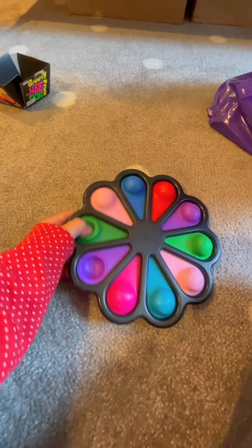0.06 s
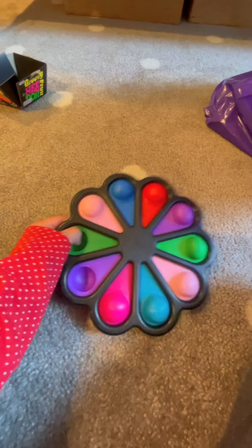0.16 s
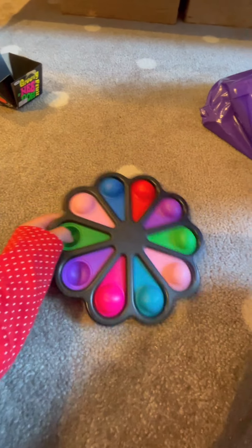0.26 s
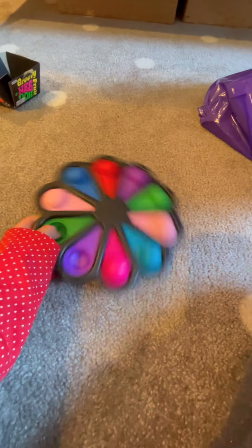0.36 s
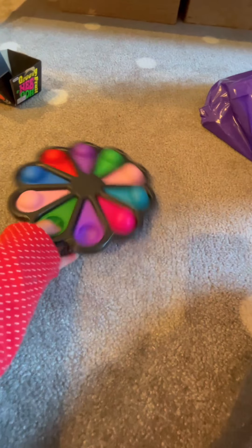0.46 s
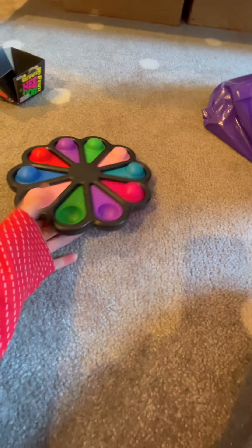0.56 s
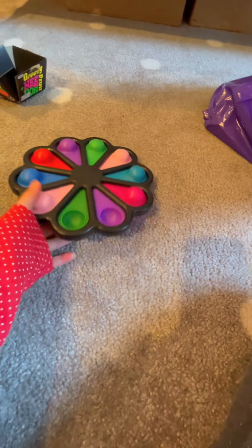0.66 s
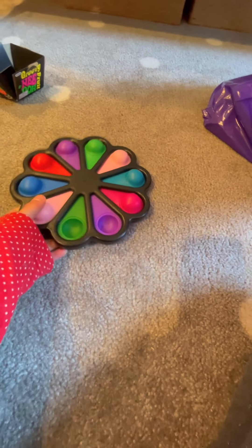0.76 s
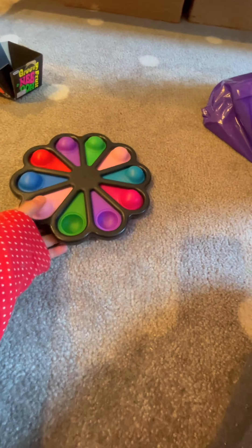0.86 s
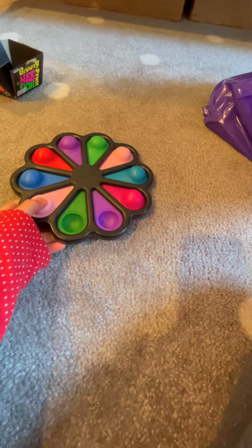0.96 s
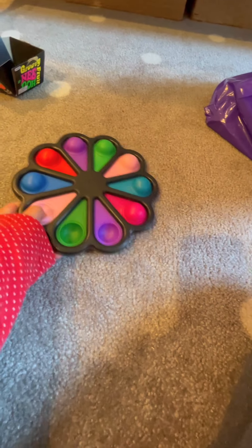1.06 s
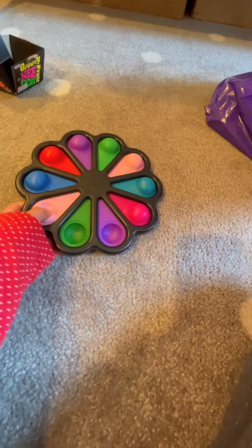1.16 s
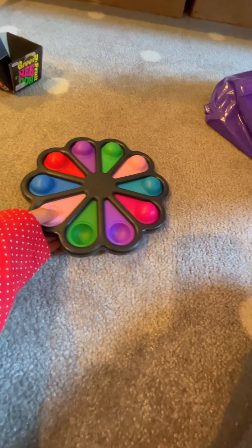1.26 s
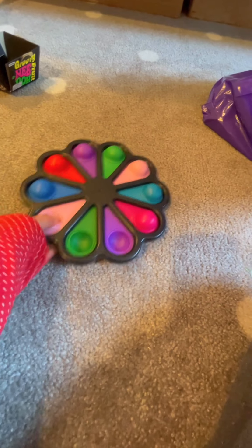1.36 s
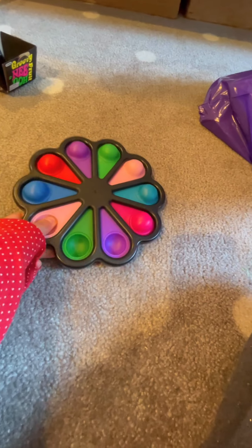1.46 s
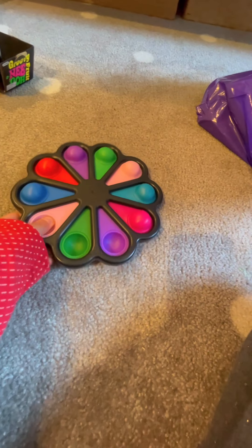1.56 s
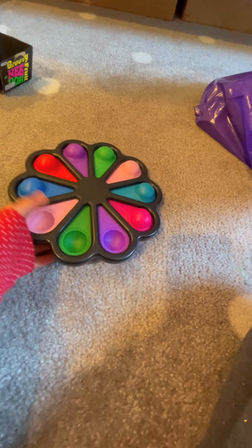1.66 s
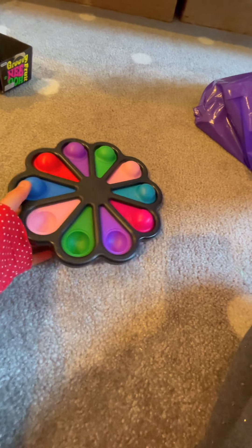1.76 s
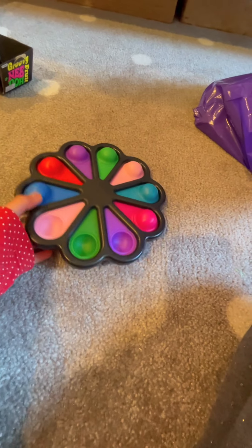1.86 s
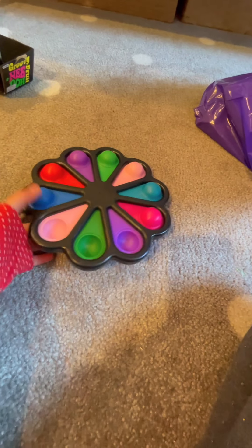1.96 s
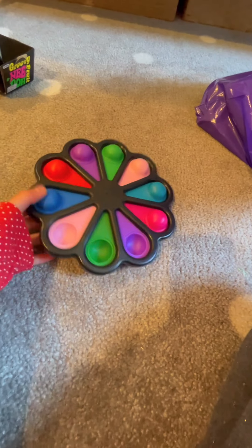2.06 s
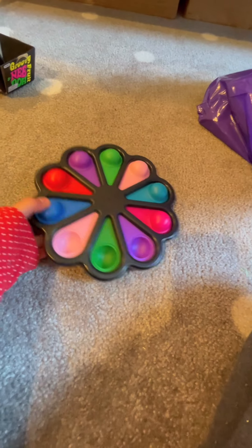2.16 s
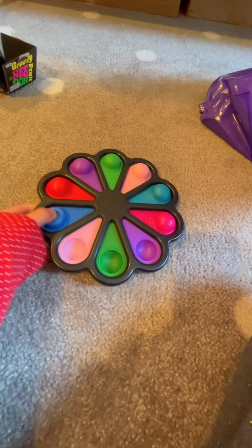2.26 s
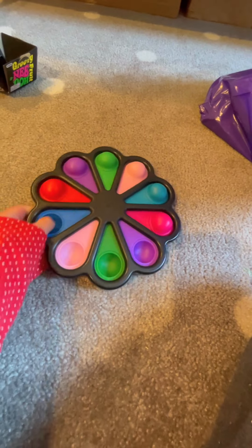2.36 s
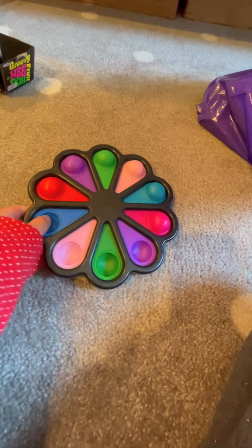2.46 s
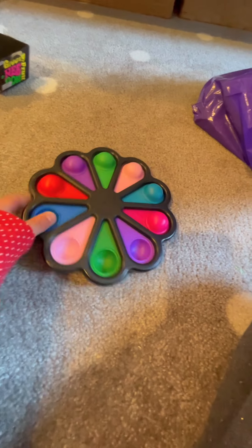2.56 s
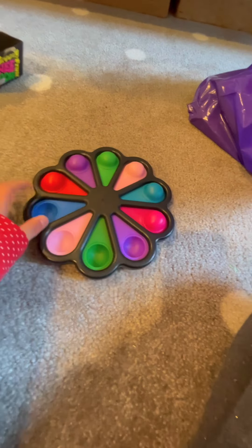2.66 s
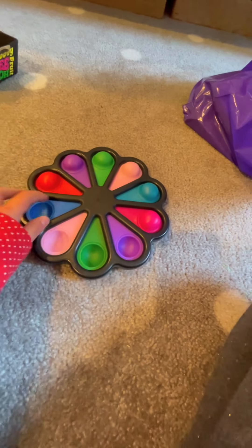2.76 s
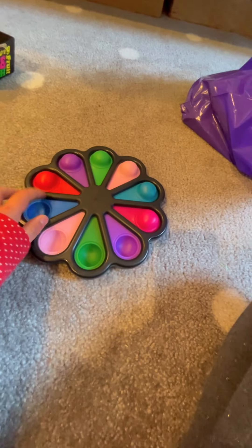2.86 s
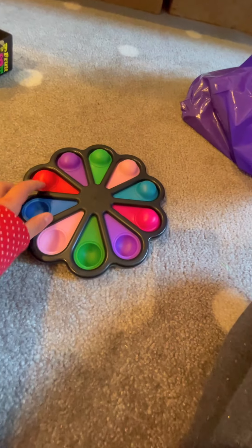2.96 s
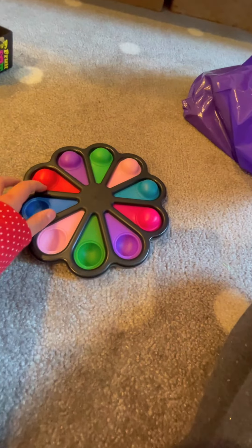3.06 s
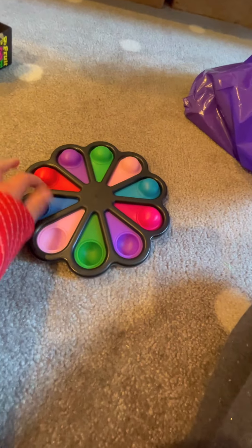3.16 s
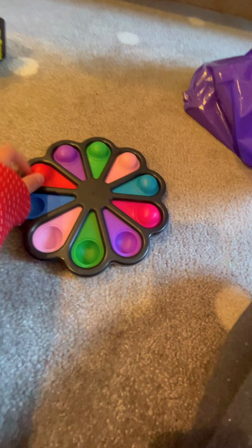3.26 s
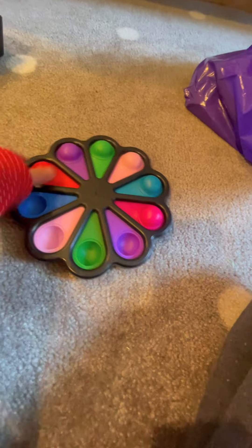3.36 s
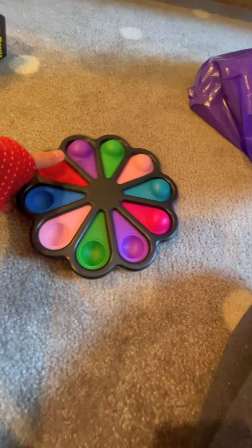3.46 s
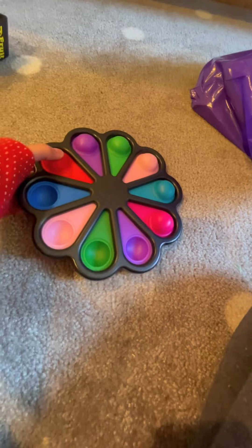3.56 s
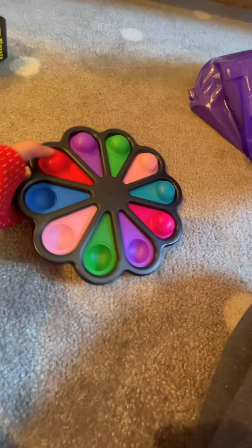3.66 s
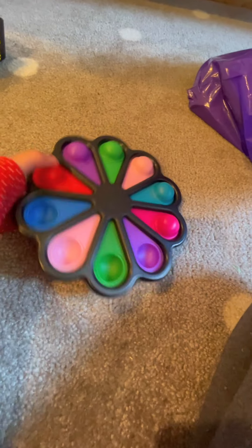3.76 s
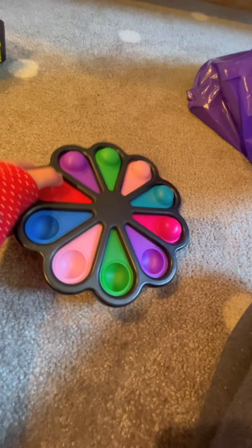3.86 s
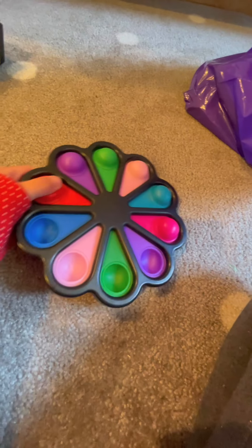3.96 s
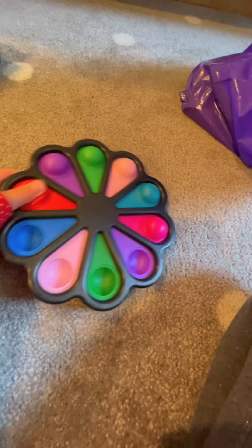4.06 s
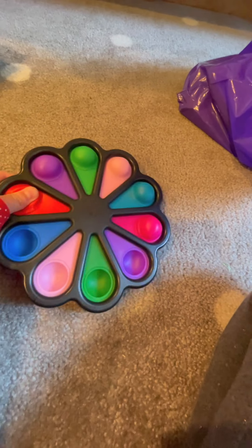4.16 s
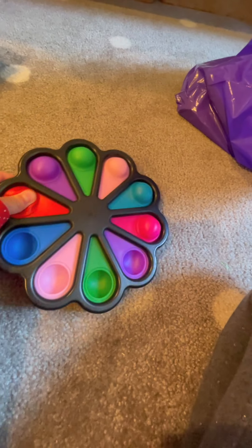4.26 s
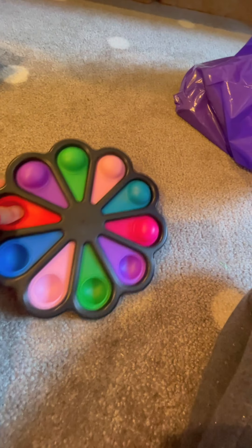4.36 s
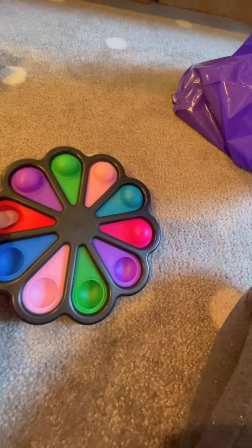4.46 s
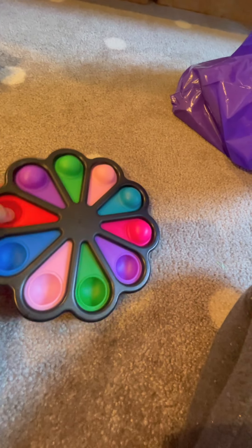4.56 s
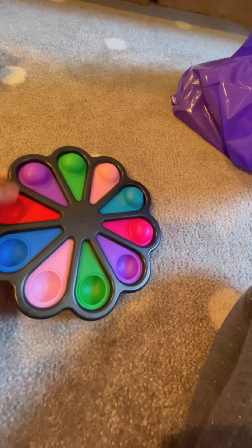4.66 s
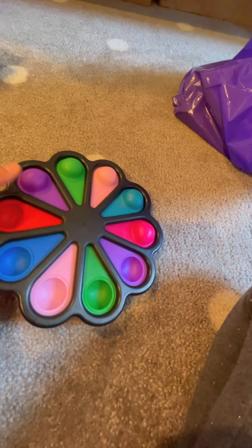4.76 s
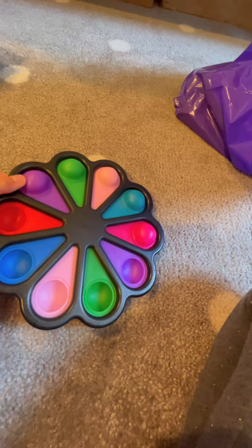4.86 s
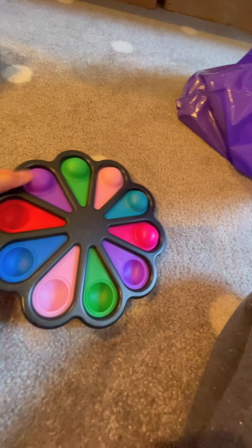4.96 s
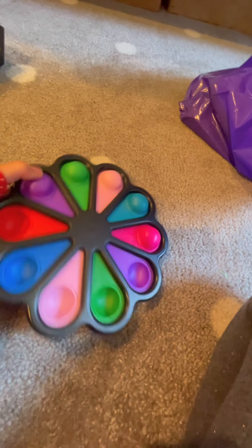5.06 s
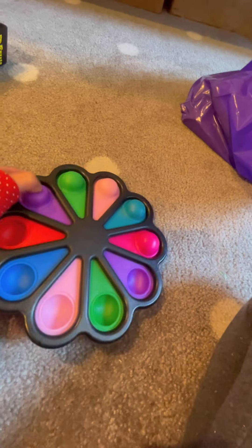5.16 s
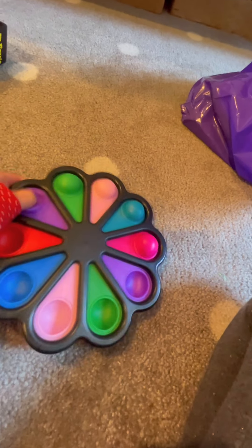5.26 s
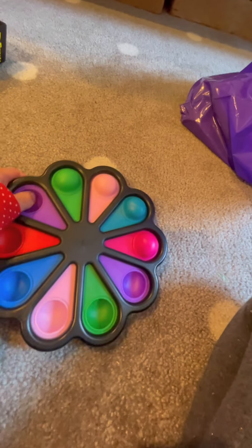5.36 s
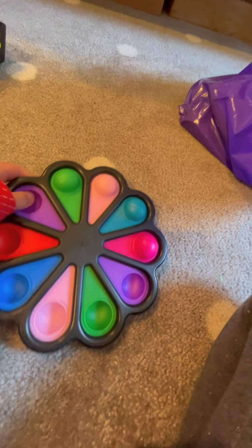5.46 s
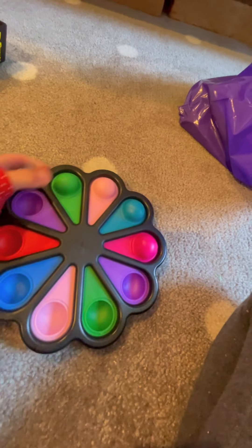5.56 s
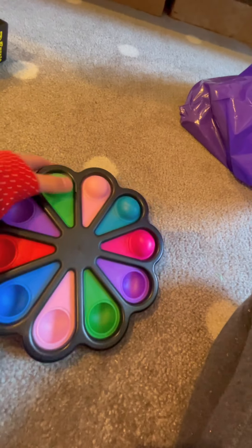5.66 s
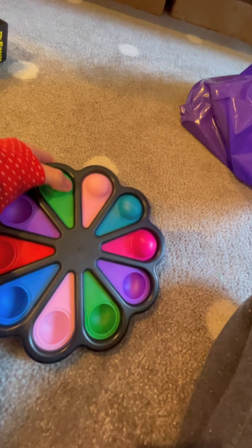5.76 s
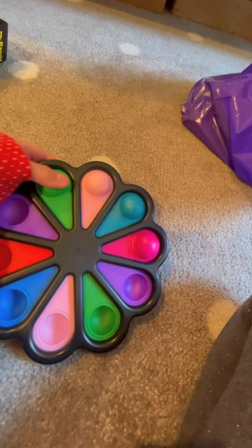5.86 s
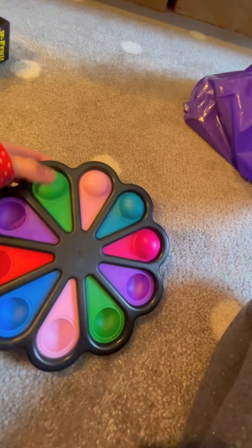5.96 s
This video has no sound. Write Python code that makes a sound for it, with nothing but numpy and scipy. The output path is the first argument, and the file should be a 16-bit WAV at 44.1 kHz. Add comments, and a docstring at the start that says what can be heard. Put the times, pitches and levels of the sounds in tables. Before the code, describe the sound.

A finger presses a fidget toy's silicone domes, making close, hollow pops with small plastic ticks between them.

```python
"""Silicone domes of a plastic fidget toy pop under a finger, over a carpet and close to a phone.
Each dome buckles and snaps through: a pulse of falling pitch, coloured by the resonances of its hollow
and of the frame. Between pops, fingertips tick on the frame and rub on the silicone.
A sleeve rustles and a small room reverberates; behind lie room tone, a far hum and one soft thump."""
import sys
import numpy as np
from scipy import signal
from scipy.fft import rfft, irfft, next_fast_len
from scipy.io import wavfile
from scipy.ndimage import map_coordinates

SR = 44100
rng = np.random.default_rng(int(sys.argv[2]) if len(sys.argv) > 2 else 0)


def output_pcm(signal):
    """Save a mono or channel-first signal as 16-bit PCM at the path in sys.argv[1].

    Samples are clipped to [-1, 1] before scaling.
    """
    pcm = np.clip(np.atleast_2d(signal).T, -1, 1) * 32767
    wavfile.write(sys.argv[1], SR, np.round(pcm).astype(np.int16))


N = 264600

# stereo width of the diffuse field: (frequency [Hz], side minus mid [dB])
DIFFUSE_WIDTH = [(60, -12), (99, -15), (160, -16.5), (270, -14), (450, -6.5), (740, 0), (1220, -4),
                 (2010, -6), (3330, 1.5), (5500, -2), (9080, 9.5), (15000, 10.5)]


def amp(db):
    """Amplitude ratio of a level in decibels."""
    return 10 ** (np.asarray(db) / 20)


def along(points, hz):
    """Interpolation of (frequency, value) points on a logarithmic frequency axis."""
    f, v = np.transpose(points)
    return np.interp(np.log(hz + 1), np.log(f + 1), v)


def wobble(rate):
    """Smooth random modulation: a spline with rate knots a second."""
    knots = rng.standard_normal(int(N * rate / SR) + 4)
    return map_coordinates(knots, [np.arange(N) * rate / SR])


def filtered(x, response):
    """Linear filtering: the spectrum of x times a complex frequency response."""
    n = x.shape[-1]
    m = next_fast_len(n + 2048)
    return irfft(rfft(x, m) * response(np.fft.rfftfreq(m, 1 / SR)), m)[..., :n]


def blend(*parts):
    """Power summation of spectra, each given as (shape, frequency scale, level [dB])."""
    return lambda f: np.sqrt(sum(amp(db + along(np.multiply(shape, [hz, 1]), f)) ** 2
                                 for shape, hz, db in parts))


def strokes(times, lengths, db):
    """Superposed Gaussian envelopes, each 9 dB down at 0.55 of its length from its middle."""
    t = np.arange(0, N, 32) / SR
    swells = np.exp(-((t - times[:, None]) / (.55 * lengths[:, None])) ** 2)
    return np.repeat(amp(db) @ swells, 32)[:N]


def mid_side_gains(width, hz):
    """Constant-power division between mid and side."""
    angle = np.arctan(amp(along(width, hz)))
    return np.array([np.cos(angle), np.sin(angle)])


def left_right(mid, side):
    """Sum and difference give the left and right channels."""
    return np.array([mid + side, mid - side])


def diffuse_noise(spectrum, grain=1):
    """A diffuse field: independent mid and side noises, scaled so that the mid has rms 1."""
    response = lambda hz: amp(along(spectrum, hz)) * [np.ones_like(hz), amp(along(DIFFUSE_WIDTH, hz))]
    mid, side = filtered(grain * rng.standard_normal((2, N)), response)
    return left_right(mid, side) / np.sqrt(np.mean(mid ** 2))


def room_tone():
    """Ambient noise: a diffuse field, mostly bass, whose level wavers slightly."""
    # noise spectrum: (frequency [Hz], relative density [dB])
    spectrum = [(15, -34.5), (25, -5.5), (80, 1), (127, -5), (170, -12.5), (249, -11), (317, -10),
                (624, -23), (887, -24), (1020, -28.5), (1700, -35), (2160, -43), (3520, -47.5),
                (4030, -53.5), (16000, -69)]
    return amp(-57.5 + .8 * wobble(4.6)) * diffuse_noise(spectrum)


def appliance_hum():
    """Two harmonics of a far appliance, slowly modulated in level and phase."""
    # harmonics: (frequency [Hz], rms level [dB])
    harmonics = [(59.2, -60), (118.4, -63.5)]
    t = np.arange(N) / SR
    hum = 0
    for hz, db in harmonics:
        amplitude = np.sqrt(2) * amp(db + 1.8 * wobble(6))
        hum += amplitude * np.exp(2j * np.pi * hz * t + .4j * wobble(3.3))
    return left_right(hum.real, amp(-8) * hum.imag)  # a weaker side in quadrature: the two microphones differ in phase by some 40 degrees


def soft_thump():
    """One soft thump: a low tone burst under a Gaussian envelope."""
    # burst: (time [s], level [dB], frequency [Hz], half-width [s])
    burst = (1, -42.5, 55, 0.04)
    time, db, hz, half_width = burst
    t = np.arange(N) / SR - time
    return -amp(db) * np.exp(-(t / half_width) ** 2) * np.cos(2 * np.pi * hz * t)


def reverberation(x):
    """Double-slope decay: convolution with a noise tail that dies at its own rate in each band."""
    # decay of the near field of reflections: (frequency [Hz], reverberation time [s])
    decay_times = [(200, .13), (500, 0.17), (1000, .22), (2500, 0.18), (6000, 0.16), (12000, .15)]
    # spectrum of the tail: (frequency [Hz], level [dB])
    colour = [(220, -12.5), (400, -13.5), (800, -9), (1500, -15.5), (2300, -14.5), (3300, -10.5),
              (7000, -12.5), (14000, -26.5)]
    hz, t, noise = signal.stft(rng.standard_normal((2, len(x))), SR, nperseg=256)
    drop_db = -60 * t / along(decay_times, hz)[:, None]
    fade = amp(drop_db) + amp(-19 + drop_db / 2)  # the slower slope comes from beyond the near walls
    fade *= amp(along(colour, hz))[:, None] / np.sqrt(np.sum(fade ** 2, 1, keepdims=True) * 128)
    tail = signal.istft(noise * fade * mid_side_gains(DIFFUSE_WIDTH, hz)[:, :, None], SR, nperseg=256)[1]
    onset = np.clip(np.arange(tail.shape[1]) / SR / .0031 - .4, 0, 1)  # walls answer after a few ms
    return left_right(*signal.fftconvolve(x[None], tail * onset, axes=1)[:, :len(x)])


def sleeve():
    """Friction noise of cloth: a grainy rustle that swells with each arm movement."""
    # movements: (middle time [s], length [s], level [dB])
    movements = [(0.03, 0.21, -84), (0.245, 0.21, -83), (0.488, 0.19, -79.5), (0.783, 0.15, -86),
                 (1.023, 0.14, -85.5), (1.36, 0.32, -82.5), (1.798, 0.33, -90.5), (2.198, .15, -86.5),
                 (2.583, 0.21, -80.5), (2.945, .22, -79.5), (3.198, .12, -91), (3.39, 0.27, -81.5),
                 (3.716, 0.16, -85.5), (4.035, .2, -86.5), (4.552, 0.26, -83.5), (5.021, .2, -85),
                 (5.198, 0.13, -87.5), (5.5, 0.22, -84.5), (5.73, 0.16, -82.5), (5.97, 0.16, -91)]
    # rustle spectrum: (frequency [Hz], relative density [dB])
    cloth = [(800, -26.5), (2000, -5), (3500, -7), (5500, -1), (7500, -7.5), (9000, -23.5), (11500, -32.5),
             (15000, -19.5)]
    grain = amp(1.2 * wobble(25) + 2 * wobble(300))
    return strokes(*np.transpose(movements)) * diffuse_noise(cloth, grain)


def rubbing():
    """Sliding friction of skin on silicone: the same slips modulate a squeaky band and a hiss."""
    # strokes: (middle time [s], length [s], squeak level [dB], hiss level [dB])
    rubs = [(0.103, 0.025, -54, -64), (0.28, 0.053, -74, -83), (0.446, 0.057, -75, -83.5),
            (0.487, 0.02, -72, -87), (0.772, 0.19, -81.5, -86.5), (0.972, 0.069, -79, -88),
            (1.225, 0.03, -66, -81), (1.6, 0.044, -70, -84), (1.633, 0.024, -81, -98),
            (1.747, 0.031, -74, -81.5), (1.854, 0.028, -82, -81), (1.883, 0.037, -71, -84),
            (1.957, 0.02, -72.5, -86.5), (2.039, 0.022, -69, -80), (2.202, 0.053, -75, -83.5),
            (2.551, 0.038, -69.5, -76), (2.641, 0.029, -74.5, -83), (3.282, 0.044, -79.5, -89),
            (3.629, 0.015, -77, -82.5), (3.687, 0.061, -76.5, -81), (3.866, 0.035, -78, -86.5),
            (4.545, 0.049, -68, -78), (4.641, 0.016, -71.5, -83), (4.818, 0.032, -70, -74.5),
            (4.986, 0.026, -80, -85), (5.061, 0.034, -71, -82), (5.179, 0.035, -69.5, -94),
            (5.461, 0.019, -69, -82), (5.687, 0.035, -75.5, -77), (5.749, 0.026, -85.5, -75.5),
            (5.886, 0.034, -71, -74)]
    # friction spectra: (frequency [Hz], relative density [dB])
    squeak_spectrum = [(350, -25), (800, 4.5), (1800, -2.5), (2550, 4.5), (3300, -11.5), (4800, -28.5)]
    hiss_spectrum = [(2500, -36), (3800, 4.5), (5000, 1), (6200, 6), (7500, -3), (9000, -23.5),
                     (11000, -32), (15000, -22.5)]
    times, lengths, squeak_db, hiss_db = np.transpose(rubs)
    slips = amp(3.5 * wobble(180))
    squeak = strokes(times, lengths, squeak_db) * diffuse_noise(squeak_spectrum, slips)
    hiss = strokes(times, lengths, hiss_db) * diffuse_noise(hiss_spectrum, slips)
    return squeak + hiss


def resonance(f, hz, width, db):
    """Frequency response of a damped oscillator, with gain db at its natural frequency hz."""
    return amp(db) * 1j * f * width / (hz * hz - f * f + 1j * f * width)


def add_impact(out, time, colour, dome, delay_cycles, crossover_hz, room_db):
    """Impulse excitation of the frame: a dispersed pulse below the crossover, a noisy crack above."""
    # modes of the plastic frame: (frequency [Hz], bandwidth [Hz], level [dB])
    modes = [(222, 53, -3), (396, 160, 0), (619, 30, -5), (1026, 260, -1), (1708, 120, -1.5),
             (2346, 220, 2.5), (6000, 3000, -3.5)]
    # stereo width of the direct sound: (frequency [Hz], side minus mid [dB])
    direct_width = [(60, -11), (140, -13.5), (330, -20), (770, -20.5), (1170, -18.5), (1790, -16.5),
                    (2740, -4.5), (4190, -4), (6410, -1), (9000, 8), (11500, 19.5), (15000, 7.5)]
    # phase of side against mid: (frequency [Hz], phase [rad])
    side_phase = [(300, 2), (700, .8), (1400, .8), (2400, 1.6), (10000, 1.6)]
    length, lead = SR * 2 // 5, 128  # samples in all, and before the pulse
    rise_s, fall_s = .01, .011  # the crack swells and dies by 60 dB in these times
    strike_db = .51 * rng.standard_normal(len(modes))  # each place excites the modes differently
    frame = lambda f: 1 + sum(resonance(f, hz, width, db + offset)
                              for (hz, width, db), offset in zip(modes, strike_db))
    # bass leaves later, by about delay_cycles / f, so the pitch falls
    dispersion = lambda f: np.exp(-2j * np.pi * delay_cycles * np.log(1 + f / 45))
    highpass = lambda f: 1 / np.sqrt(1 + (crossover_hz / (f + 1)) ** 4)
    stereo = lambda f: mid_side_gains(direct_width, f) * [np.ones_like(f), np.exp(1j * along(side_phase, f))]
    t = (np.arange(length) - lead) / SR
    pulse = 1. * (t == 0)
    chirp = filtered(pulse, lambda f: dispersion(f) * np.sqrt(1 - highpass(f) ** 2))
    burst = amp(60 * np.minimum(t / rise_s, -t / fall_s)) * rng.standard_normal(length)
    crack = filtered(burst / np.linalg.norm(burst), highpass)
    direct = left_right(*filtered(chirp + crack, lambda f: colour(f) * frame(f) * dome(f) * stereo(f)))
    # the walls receive sound from all sides of the toy, which evens out its resonances
    radiated = filtered(pulse, lambda f: colour(f) * dispersion(f) * np.abs(frame(f)) ** .29)
    echo = amp(room_db) * reverberation(radiated)
    span = out[:, round(time * SR) - lead:][:, :length]
    span += (direct + echo)[:, :span.shape[1]]


def finger_ticks():
    """Light impacts on the frame: the soft pad gives a low knock, the hard nail a click."""
    # touches: (time [s], knock level [dB], click level [dB], click centre [Hz])
    touches = [(0.056, -27, -31, 1400), (0.068, -28, -33, 2400), (1.024, -12, -30, 2000),
               (1.153, -23, -47, 4500), (1.16, -33, -38.5, 2400), (1.222, -13.5, -30, 2600),
               (1.388, -26.5, -20.5, 3000), (1.545, -28, -45, 4000), (1.584, -30, -24, 2700),
               (1.63, -33, -38, 2980), (1.833, -25, -33.5, 2090), (1.887, -22, -31, 1200),
               (2.137, -34, -35, 1200), (2.329, -31, -41.5, 3500), (2.535, -24, -23.5, 2300),
               (2.642, -24, -31, 1660), (3.037, -41, -31.5, 1970), (3.519, -37.5, -43, 2970),
               (4.071, -31, -30, 6000), (4.635, -33, -31.5, 1406), (4.981, -45.5, -26, 1116),
               (5.239, -13, -35.5, 3500), (5.271, -34, -45, 1700), (5.415, -19.5, -17, 1200),
               (5.466, -27, -34.5, 2580), (5.655, -42, -29, 995), (5.808, -29, -29, 1022),
               (5.861, -23.5, -32, 1010)]
    # spectrum of the pad: (frequency [Hz], level [dB])
    knock = [(40, -16), (500, -0.5), (1000, -12), (2200, -29.5), (16000, -60)]
    # spectrum of the nail: (frequency [multiple of its centre], level [dB])
    click = [(.05, -40.5), (.45, -10.5), (1.01, 2), (2.1, -11), (5, -23), (16, -33)]
    out = np.zeros((2, N))
    for time, knock_db, click_db, click_hz in touches:
        colour = blend((knock, 1, knock_db), (click, click_hz, click_db))
        add_impact(out, time, colour, dome=np.ones_like, delay_cycles=.95, crossover_hz=1300, room_db=2)
    return out


def dome_pops():
    """Snap-through buckling: each dome flips and rings at the resonance of its hollow; a weaker copy of each
    pop follows a millisecond or two later."""
    # snaps: (time [s], pitch [Hz], ring bandwidth [Hz], push level [dB], slap centre [Hz],
    # slap level [dB], crack centre [Hz], crack level [dB], rebound delay [s], room level [dB])
    snaps = [(0.105, 558, 150, 8, 1300, 2.5, 5000, -14, .001, 8),
             (0.125, 795, 150, 12, 2350, 3, 5500, -10.5, .0028, 3.5),
             (1.032, 394, 35, 4, 1550, -6.5, 5500, -18.5, .001, 8),
             (1.395, 900, 150, -27.5, 2300, -10.5, 5500, -13, .0016, 5),
             (1.398, 804, 150, 11.5, 2200, -1, 5500, -7.5, .0015, 5.5),
             (2.336, 534, 149, -1.5, 2500, -15.5, 5000, -15, .0017, 7.5),
             (2.348, 700, 151, -5, 2500, -12.5, 6000, -25, .0013, 4.5),
             (2.357, 894, 150, 17.5, 2400, 13.5, 5000, -10, .0013, 4.5),
             (4.079, 470, 109, -3, 1151, 0, 6000, -7.5, .0011, 5),
             (4.331, 900, 150, 0, 2300, -8, 5800, -16, .0018, 6.5),
             (4.339, 1059, 150, 15.5, 1900, 12, 6000, 3, .0016, 7.5),
             (5.247, 753, 150, 8, 1200, 5.5, 5200, -9.5, .0018, 3),
             (5.284, 790, 150, -7, 2600, -11, 6000, -22.5, .0015, 3.5),
             (5.292, 1045, 150, 18.5, 2300, 13, 5800, -3, .0014, 3)]
    # air pushed by the dome: (frequency [multiple of its pitch], level [dB])
    push = [(.05, -34.5), (.25, -11.5), (.55, -3.5), (1.05, -0.5), (1.9, -10.5), (4, -24), (20, -60.5)]
    # silicone meeting the frame: (frequency [multiple of its centre], level [dB])
    slap = [(.12, -39), (.55, -13.5), (.8, -3.5), (1.02, -1), (1.25, -4.5), (1.6, -15.5), (7, -50.5)]
    # the rim flicking over: (frequency [multiple of its centre], level [dB])
    crack = [(.15, -28), (.6, -11), (.88, -5), (1.02, -1), (1.2, -7.5), (1.9, -12.5), (3, -8)]
    out = np.zeros((2, N))
    for time, hz, width, push_db, slap_hz, slap_db, crack_hz, crack_db, rebound_s, room_db in snaps:
        ring_db = -5.5 + 20 * np.log10(96 / width)  # a narrower resonance stands higher
        rebound = lambda f: 1 + amp(-9) * np.exp(-2j * np.pi * f * rebound_s)
        dome = lambda f: (1 + resonance(f, hz, width, ring_db)) * rebound(f)
        colour = blend((push, hz, push_db), (slap, slap_hz, slap_db), (crack, crack_hz, crack_db))
        add_impact(out, time, colour, dome, delay_cycles=1.6, crossover_hz=3500, room_db=room_db)
    return out


def scene():
    """Superposition: the sound pressures of all sources add."""
    return dome_pops() + finger_ticks() + rubbing() + sleeve() + appliance_hum() + room_tone() + soft_thump()


def record(dry):
    """Band limiting: the phone's response falls from 16 kHz to nothing at 16.9 kHz."""
    return filtered(dry, lambda hz: np.clip((16900 - hz) / 900, 0, 1) ** 2)


dry = scene()
out = record(dry)
output_pcm(out)
```